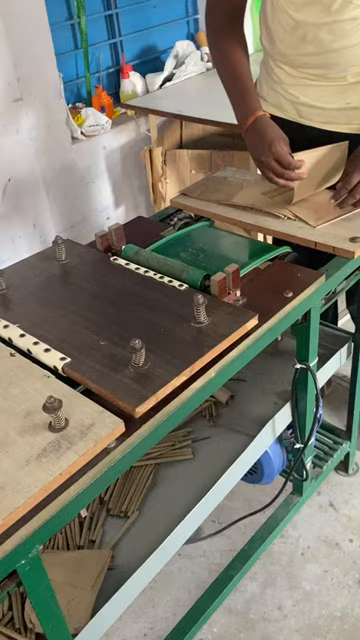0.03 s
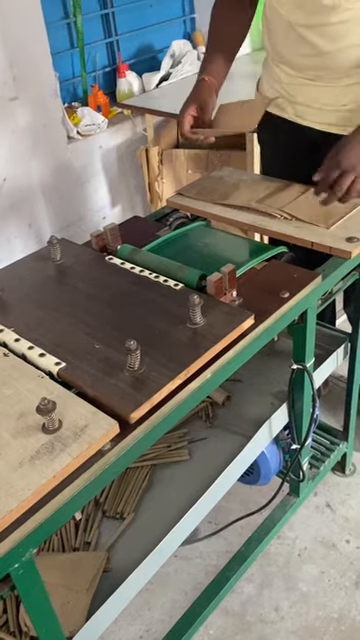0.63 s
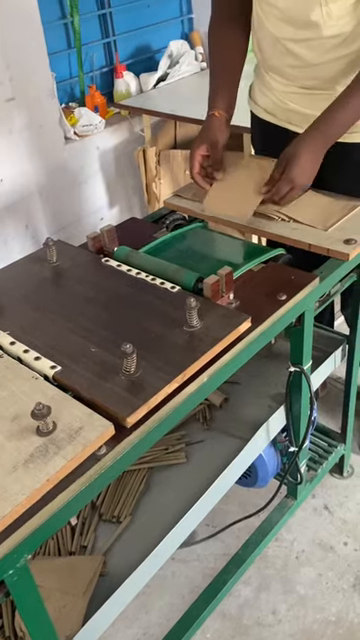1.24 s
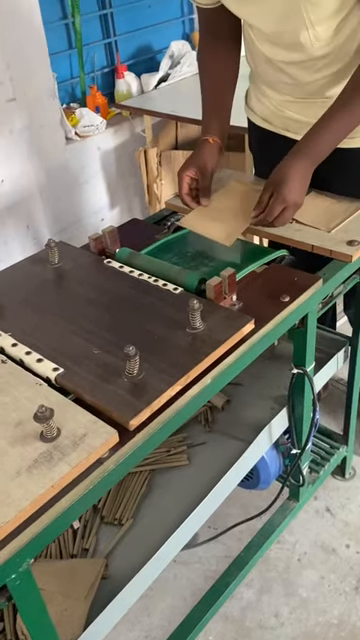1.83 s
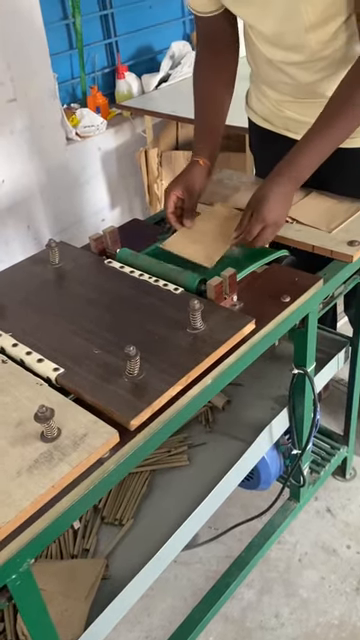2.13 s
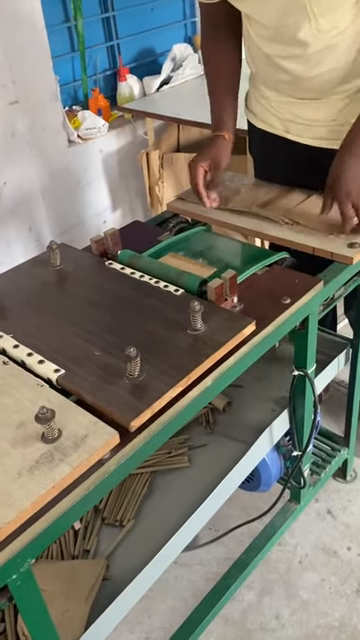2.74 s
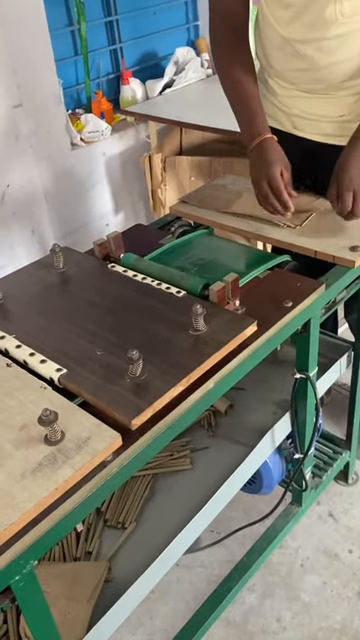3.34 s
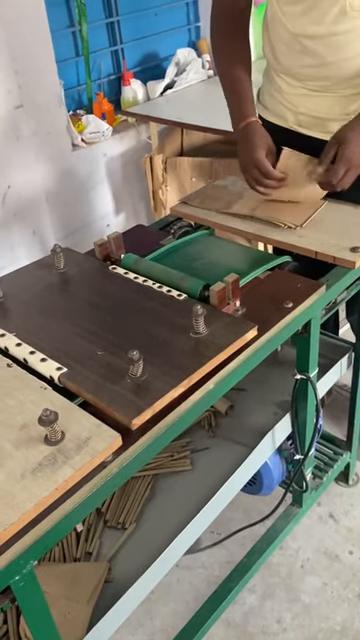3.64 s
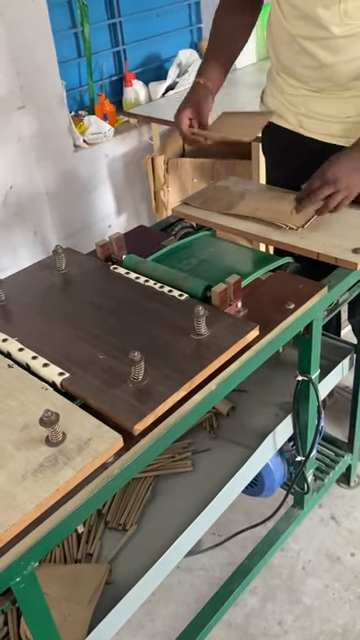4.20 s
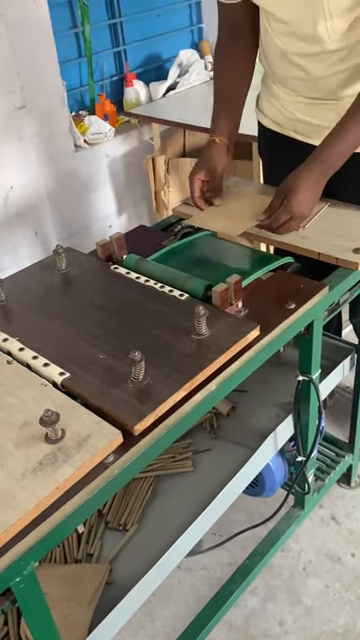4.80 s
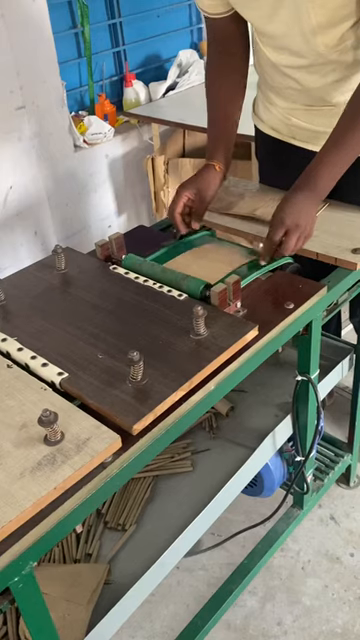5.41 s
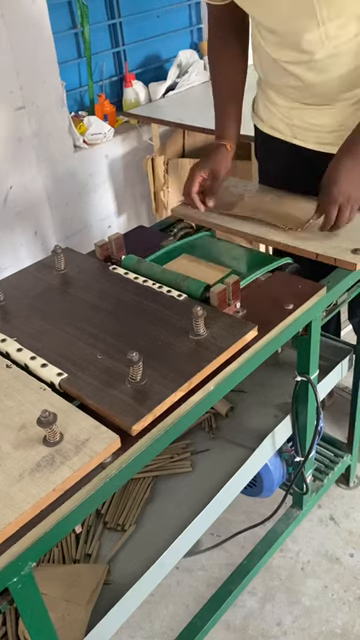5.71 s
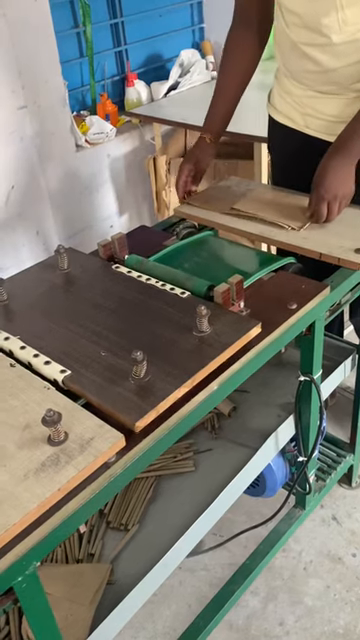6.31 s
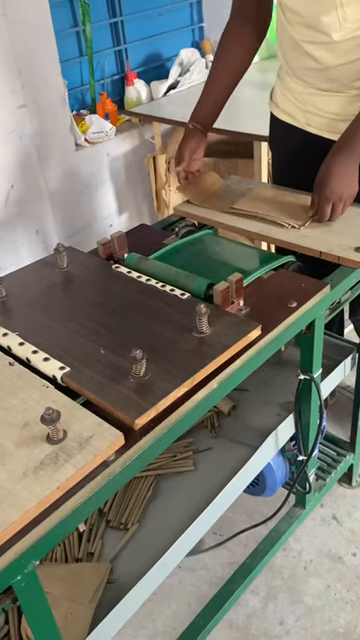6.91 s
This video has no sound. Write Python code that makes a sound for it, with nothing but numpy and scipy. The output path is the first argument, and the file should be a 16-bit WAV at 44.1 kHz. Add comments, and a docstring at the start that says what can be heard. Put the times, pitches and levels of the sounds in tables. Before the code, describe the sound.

A motor-driven rolling machine throbs and rumbles with a jingling metal rattle, while paper sheets rub through and a few wooden knocks sound.

```python
"""A paper-tube rolling machine runs in a small workshop, its induction motor beating against the mains hum.
Friction of belt and rollers drives the frame into a rumble and hiss, and a loose steel part
jingles by repeated impact on every turn of the drive pulley. Hand-fed sheets rub through the boards,
one curling into a hollow tube. A few wooden knocks excite the modes of board and frame,
and wood scrapes briefly. The sound starts abruptly and cuts out once for an instant."""
import sys
import numpy as np
from scipy import signal
from scipy.fft import rfft, irfft
from scipy.io import wavfile
from scipy.ndimage import uniform_filter1d

SR = 44100
rng = np.random.default_rng(int(sys.argv[2]) if len(sys.argv) > 2 else 0)


def dump(signal):
    """Clip the signal to [-1, 1] and save it as 16-bit WAV at the path in sys.argv[1]."""
    limited = np.clip(np.atleast_2d(signal).T, -1, 1)
    pcm = np.round(limited * 32767).astype(np.int16)
    wavfile.write(sys.argv[1], SR, pcm)


N = 306495
TIME = np.arange(N) / SR
FREQ = np.maximum(np.arange(N // 2 + 1) * SR / N, 1)

# motor shaft, slowed a little by load: (time [s], speed [turns/s])
SHAFT_SPEED = [(0, 48.4), (0.3, 47.69), (2.8, 47.69), (3.15, 47.22), (3.5, 47.69), (5.5, 47.68),
               (6.3, 47.36), (6.95, 47.65)]
# motor partials, whose two rates add: (mains multiple [1], shaft multiple [1], relative level [dB])
HUM_LINES = [(0, 1, -16), (0, 2, -6.5), (2, 0, -1.5), (0, 3, -23), (2, 1, -11), (2, 2, -16), (4, 0, -17),
             (0, 5, -15.5), (2, 3, -14), (4, 1, -17), (2, 5, -19), (0, 10, -23.5), (0, 13, -32.5)]
# the rollers grip a sheet and damp the throb: (time [s], hold [s], depth [dB])
LOADS = [(2.74, 0.73, 6), (5.8, 0.69, 6)]
# how hard the machine runs; only swings about the mean count: (time [s], rumble [dB], hiss [dB])
RUNNING = [(0.3, -31, -36.5), (0.91, -32.5, -37.5), (1.17, -29, -35), (1.47, -35, -37), (2.04, -35, -41),
           (2.21, -34.5, -38.5), (2.47, -35, -39), (2.93, -34, -40), (3.24, -31.5, -35.5),
           (4.21, -32.5, -33.5), (4.65, -32, -37), (4.93, -31.5, -38.5), (5.19, -31, -34.5),
           (5.75, -31, -37), (6.13, -32.5, -38), (6.47, -28.5, -37.5), (6.65, -30, -37), (6.95, -31, -36)]
# hard landings of the loose part: (time [s], level [dB])
CHINKS = [(0.1277, -28), (0.1606, -24.5), (0.2427, -24.5), (0.413, -26), (0.497, -18.5), (0.573, -21),
          (0.8754, -29), (0.9712, -22.5), (1.055, -32), (1.125, -25), (1.1446, -22.5), (1.21, -23.5),
          (1.252, -27), (1.28, -23.5), (1.3075, -19), (1.332, -18.5), (1.347, -18.5), (1.4611, -28),
          (1.505, -22), (1.5453, -22), (1.588, -22.5), (1.726, -23), (1.8158, -25), (1.935, -27.5),
          (2.171, -27), (2.226, -26), (2.3517, -25), (2.392, -30), (3.038, -28), (3.056, -29.5),
          (3.097, -26), (3.1325, -23.5), (3.1745, -25), (3.217, -27.5), (3.246, -26), (3.2853, -23),
          (3.345, -24.5), (3.3715, -24), (3.4326, -24), (3.454, -24), (3.471, -21), (3.498, -26),
          (3.5528, -24), (3.583, -24.5), (3.623, -21.5), (3.6651, -20), (3.68, -24), (3.708, -21),
          (3.7618, -34), (3.8357, -20), (4.022, -28), (4.056, -24.5), (4.139, -19), (4.18, -25),
          (4.2218, -24.5), (4.2617, -17.5), (4.387, -23), (4.439, -25), (4.4734, -21), (4.486, -23.5),
          (4.5999, -31), (4.6838, -23), (5.033, -24), (5.221, -23), (5.363, -21.5), (5.403, -17),
          (5.5287, -16.5), (5.556, -23), (5.6147, -23.5), (5.655, -21), (5.8482, -26), (5.989, -20.5),
          (6.032, -28), (6.076, -26), (6.117, -22.5), (6.159, -29), (6.2604, -26), (6.3695, -25),
          (6.423, -26), (6.59, -27.5), (6.864, -28), (6.9082, -27)]
# sliding strokes of paper and of wood: (time [s], level [dB], half length [s])
PAPER_SLIDES = [(0.258, -29.5, 0.052), (1.34, -23, 0.011), (2.234, -34.5, 0.041), (2.47, -31, 0.078),
                (2.67, -33.5, 0.11), (3.157, -49, 0.051), (3.68, -32, 0.053), (5.21, -32, 0.032),
                (5.238, -28.5, 0.015), (5.773, -28, 0.035), (6.603, -32, 0.06), (6.8, -28.5, 0.061)]
WOOD_SCRAPES = [(6.357, -27, 0.013), (6.378, -30.5, .014), (6.398, -23, 0.016), (6.445, -30, 0.0096)]
# blows: (time [s], board thud [dB], frame clack [dB], crack [dB], thud and clack t60 [s], pan L-R [dB],
# clack pitch [Hz], lift of the first swing [dB], board ring [dB], frame ring [dB])
KNOCKS = [(1.3492, -40, -14.5, -20, 0.07, -6, 1820, 2, -50, -40),
          (1.3521, -46, -21.5, -33, 0.049, 3, 1776, 20, -32, -45),
          (1.3584, -20, -14.5, -18, 0.053, 4, 1270, 10, -33.5, -34),
          (2.4275, -29, -26, -17.5, 0.09, -4.5, 1840, 3, -45, -38),
          (2.4315, -19, -22, -15, 0.082, 1, 1470, 2, -37, -20),
          (2.4365, -19.5, -28, -32, 0.12, 1, 1130, 0, -22.5, -36),
          (2.609, -23.5, -28, -29.5, 0.21, 1, 1530, 0, -35, -37),
          (5.2238, -36, -20.5, -16, 0.031, 2, 1550, 8, -36, -32),
          (5.2378, -30.5, -16, -29, 0.057, -2, 1980, 3, -42, -34),
          (5.782, -34, -19, -12, 0.016, 8, 1550, 4, -32, -36),
          (6.2995, -14.5, -22.5, -22.5, 0.24, -0.5, 1430, 5, -13.5, -25),
          (6.382, -40, -27, -29, 0.22, 5, 1550, -4, -27.5, -40)]

# spectra of friction and impact noise: (frequency [Hz], relative density [dB])
RUMBLE_SPECTRUM = [(35, -33), (55, -14), (78, -1), (100, -25), (125, -11.5), (148, -1.5), (175, -3.5),
                   (215, -10), (248, 2.5), (300, -5.5), (380, -6), (470, 1), (700, -4), (1200, -18.5)]
RUB_SPECTRUM = [(500, 2.5), (850, 3), (1200, -1.5), (1480, -4.5), (2100, 1), (2700, -3), (4000, -15.5)]
HISS_SPECTRUM = [(1800, -9), (2800, 0), (4000, 0.5), (5600, 2), (6500, 1), (9000, -11), (12000, -18),
                 (13500, -23), (16000, -39)]
RATTLE_SPECTRUM = [(2000, 7), (3000, -10), (5500, -4), (7000, 4), (9500, -5.5), (11500, -10.5), (12500, -3),
                   (13500, -21), (16000, -36)]
CHINK_SPECTRUM = [(2000, 8), (3000, -4), (5500, 0.5), (7000, 14), (9500, -0.5), (11500, -6), (13000, -2.5),
                  (16000, -12)]
TUBE_SPECTRUM = [(300, -17), (600, -8.5), (850, -8.5), (1100, -12), (1400, -16.5), (3000, -22.5)]
THUD_SPECTRUM = [(80, -34), (200, -0.5), (330, -5), (450, -7), (540, 1.5), (680, -5), (900, -4),
                 (1300, -36), (3000, -8)]
CLACK_SPECTRUM = [(400, -14), (850, 1), (1150, -8.5), (1480, -2), (1900, -6.5), (2500, -7), (4000, -40),
                  (9000, -22.5)]
CRACK_SPECTRUM = [(1500, -10), (3000, 0.5), (4800, 0.5), (6000, 3), (8000, -4.5), (11000, -19),
                  (16000, -28)]
SCRAPE_SPECTRUM = [(450, 4), (1000, -10), (1500, -1), (2000, -10), (2800, -13)]
# resonances that colour the noise: (frequency [Hz], bandwidth [Hz], lift [dB])
FRAME_MODES = [(242.5, 9.9, 6.3), (320, 136, 2.7), (461.5, 11, 3.2), (603, 10.6, 5.7), (1462, 160, 8.4),
               (1645, 23, 7.6), (1830, 15, 2.7), (1950, 7.5, 1), (3502, 47, 8.7), (4900, 180, 0.9)]
STEEL_MODES = [(3140, 70, 16), (4650, 1000, 9.5), (5580, 84, -0.5), (9970, 110, 14), (10730, 230, 9)]
TUBE_MODES = [(620, 70, 1.5), (790, 62, 4.5), (1000, 100, 1.5)]
BOARD_MODES = [(440, 120, 14.3), (637, 58, 12), (730, 69, 17), (840, 38, 5.7)]
SCRAPE_MODES = [(1550, 52, 9)]
# free vibration after a blow: (frequency [Hz], relative level [dB], t60 [s])
STEEL_RING = [(3306, -21, 0.045), (4910, -5, 0.042), (5495, -4.5, .035), (9860, -3, 0.022)]
BOARD_RING = [(262, -5, 0.083), (464.7, -5.5, 0.29), (606.4, 1, 0.12), (698, -6, 0.29), (830, -9.5, 0.32)]
FRAME_RING = [(1130, 1, 0.072), (1465, -1.5, 0.16), (1910, 5, 0.094), (1995, -3, 0.085), (3400, -13, 0.22),
              (4250, -13, .11), (4825, -1, .08)]

# likeness of the sound at two microphone ports: (frequency [Hz], coherence [0-1])
PORT_COHERENCE = [(100, .999), (180, .99), (350, .88), (700, .68), (1400, .64), (2800, .56), (5000, .79),
                  (10000, .9)]
# phase between the ports: (frequency [Hz], lead of the left [rad])
PORT_LEAD = [(150, 0), (600, .7), (1890, .4), (2760, 2.1), (4050, .4), (5340, .3), (6460, 2.8), (8180, 3.8),
             (9730, 6.2), (11600, 6.4), (12500, 9.4)]
# balance between the ports: (frequency [Hz], level L-R [dB])
PORT_BALANCE = [(200, 0), (380, 1), (700, 4.5), (1290, 3), (2380, -1.8), (4400, 0)]
# hollows in the treble: (frequency [Hz], bandwidth [Hz], gain [dB])
TREBLE_DIPS = [(7280, 1700, -24), (13900, 1200, -9)]

SIDES = np.array([[1], [-1]])   # left, right
BLOW_ATTACK_S = 0.00091


def from_db(db):
    """Amplitude ratio of a level in decibels."""
    return 10 ** (np.asarray(db) / 20)


def rms_one(x):
    """Normalisation to unit power."""
    return x / np.sqrt(np.mean(x ** 2) + 1e-20)


def in_time(rows):
    """Linear interpolation of each column over time."""
    times, *columns = np.transpose(rows)
    return [np.interp(TIME, times, column) for column in columns]


def over_hz(points):
    """Linear interpolation over log frequency."""
    hz, value = np.transpose(points)
    return np.interp(np.log(FREQ), np.log(np.maximum(hz, 1)), value)


def drift(corner_hz):
    """Random fluctuation: low-passed noise of unit power."""
    return rms_one(irfft(rfft(rng.standard_normal(N)) / (1 + (FREQ / corner_hz) ** 2), N))


def ports():
    """Transfer function of each port: gain and phase against frequency."""
    return from_db(SIDES * over_hz(PORT_BALANCE) / 2) * np.exp(.5j * SIDES * over_hz(PORT_LEAD))


def noise(spectrum, modes=()):
    """Source and filter: partly coherent stereo noise, shaped by a spectrum and resonances."""
    octaves_outside = np.abs(np.log2(FREQ / np.clip(FREQ, spectrum[0][0], spectrum[-1][0])))
    level_db = over_hz(spectrum) - 20 * octaves_outside
    level_db += sum(lift / (1 + (2 * (FREQ - hz) / width) ** 2) for hz, width, lift in modes)
    coherence = np.clip(over_hz(PORT_COHERENCE), 0, 1)
    mid, side = rfft(rng.standard_normal((2, N)))
    pair = np.sqrt(1 + coherence) * mid + np.sqrt(1 - coherence) * side * SIDES
    return rms_one(irfft(pair * ports() * from_db(level_db), N))


def chatter(sound, depth_db):
    """Random amplitude modulation of narrow bands makes the noise flicker."""
    _, _, frames = signal.stft(sound, nperseg=1024)
    swell = rms_one(uniform_filter1d(rng.standard_normal(frames.shape[1:]), size=3, axis=1))
    swell = rms_one(uniform_filter1d(swell, size=2, axis=0))
    return rms_one(signal.istft(frames * from_db(depth_db * swell))[1][:, :N])


def running():
    """Slow modulation of rumble and belt hiss about their means, in dB."""
    return [db - db.mean() for db in in_time(RUNNING)]


def load(grip_s=0.1, release_s=0.39):
    """Damping of the throb by the sheets, in dB: a quick grip, a hold, a slow release."""
    return sum(depth * np.clip(np.minimum((TIME - s) / grip_s, 1 - (TIME - s - hold) / release_s), 0, 1)
               for s, hold, depth in LOADS)


def motor(turns, level_db, mains_hz=50):
    """Beating: twice the shaft rate lies just under the magnetic hum, giving about five throbs a second."""
    throb_db = level_db + running()[0] - load()
    hum = 0
    for of_mains, of_shaft, line_db in HUM_LINES:
        cycles = of_mains * mains_hz * TIME + of_shaft * turns
        order = of_mains + of_shaft
        shudder = from_db(-13.5) * (order - 1) * drift(18.3)   # phase jitter smears high lines most
        swell_db = throb_db if order == 2 else (throb_db + throb_db.mean()) / 2
        waver_db = (3.5 if order > 2 else 1.2) * drift(5.9)
        hum += from_db(line_db + swell_db + waver_db) * np.cos(2 * np.pi * cycles + shudder)
    return np.sqrt(2) * hum


def rollers(turns, rumble_db, rub_db, hiss_db):
    """Forced vibration: belt and rollers shake the frame as their grip catches unevenly."""
    rumble_swing, hiss_swing = running()
    rub_swing = (rumble_swing + hiss_swing) / 2
    grip_db = 0.1 * np.cos(2 * np.pi * turns) + drift(61) + 1.6 * drift(1.4)
    rumble = chatter(noise(RUMBLE_SPECTRUM, FRAME_MODES), depth_db=1.5)
    rub = chatter(noise(RUB_SPECTRUM, FRAME_MODES), depth_db=3.5)
    hiss = chatter(noise(HISS_SPECTRUM, FRAME_MODES), depth_db=3.2)
    return (rumble * from_db(rumble_db + rumble_swing + grip_db / 2)
            + rub * from_db(rub_db + rub_swing + grip_db)
            + hiss * from_db(hiss_db + hiss_swing + grip_db))


def touches(times, level_db, bounce_s, bounce_db, t60, attack_s):
    """Envelope of double contacts: their energies add and decay exponentially."""
    bounces = times + bounce_s * rng.uniform(0.98, 1.7, len(times))
    starts = np.clip((np.r_[times, bounces] * SR).astype(int), 0, N - 1)
    impulses = np.zeros(N)
    np.add.at(impulses, starts, from_db(np.r_[level_db, level_db + bounce_db]) ** 2)
    energy = signal.lfilter([1], [1, -from_db(-120 / (t60 * SR))], impulses + 1e-18)
    lag = np.exp(-1 / (attack_s * SR))
    return signal.lfilter([1 - lag], [1, -lag], np.sqrt(energy))


def ringing(times, level_db, modes, scatter_db, detune):
    """Modal superposition: damped sines whose strength and pitch vary from blow to blow."""
    hz, mode_db, t60 = np.transpose(modes)
    age, out = TIME[:int(t60.max() * SR)], np.zeros(2 * N)
    fade = from_db(-60 * age / t60[:, None]) * (1 - np.exp(-age / BLOW_ATTACK_S))
    chance = rng.standard_normal((len(times), 2, len(hz)))
    for s, blow_db, (strength, pitch) in zip(times, level_db, chance):
        start = max(int(s * SR), 0)
        waves = np.sin(2 * np.pi * np.outer(hz * (1 + detune * pitch), age)) * fade
        out[start:start + len(age)] += from_db(blow_db + mode_db + scatter_db * strength) @ waves
    return irfft(rfft(out[:N]) * ports(), N)


def loose_part(turns, level_db, limit_db, rebound_db, scatter_db):
    """Periodic impact: the pulley, at half shaft speed, throws the part once a turn; it rebounds twice."""
    count = np.arange(int(turns[-1] * 3 / 2))
    timing, strength = rng.standard_normal((len(count), 2)).T
    times = np.interp(count * 2 / 3, turns, TIME) + 0.0011 * timing
    belt_db = np.interp(times, TIME, running()[1])
    throw_db = np.minimum(level_db + 2.1 * belt_db, limit_db)   # grows until the play is used up
    hit_db = throw_db + rebound_db * (count % 3 > 0) + scatter_db * np.clip(strength, -2, 1.5)
    envelope = touches(times, hit_db, bounce_s=0.004, bounce_db=-2, t60=0.031, attack_s=0.00054)
    grain = from_db(0.5 * drift(600))
    contact = envelope * grain * chatter(noise(RATTLE_SPECTRUM, STEEL_MODES), depth_db=1.5)
    return contact + ringing(times, hit_db - 2, STEEL_RING, scatter_db=2.5, detune=0.0092)


def chinks(settle_s, settle_db):
    """Hard impact excites high modes: the part lands with a bright chink, then settles more lightly."""
    times, hit_db = np.transpose(CHINKS)
    times = np.r_[times, times + settle_s * rng.uniform(.5, 1.5, len(times))]
    hit_db = np.r_[hit_db, hit_db + settle_db]
    envelope = touches(times, hit_db + 0.2, bounce_s=0.0039, bounce_db=-6.5, t60=0.034, attack_s=0.00058)
    grain = from_db(2 * drift(490))
    contact = envelope * grain * chatter(noise(CHINK_SPECTRUM, STEEL_MODES), depth_db=3.5)
    return contact + ringing(times, hit_db - 4.5, STEEL_RING, scatter_db=6, detune=0.015)


def strokes(rows):
    """Gaussian envelopes: each sliding stroke swells and fades smoothly."""
    return sum(from_db(db) * np.exp(-((TIME - s) / half_length) ** 2) for s, db, half_length in rows)


def paper_slides(grain_db):
    """Sliding friction: sheets rasp over the table and belt."""
    return strokes(PAPER_SLIDES) * from_db(grain_db * drift(150)) * noise(RUB_SPECTRUM, FRAME_MODES)


def knocks(board_hz, swing_t60, room_db, room_t60):
    """Impulse response: a blow swings the main modes, scatters into the rest and reverberates."""
    thud = noise(THUD_SPECTRUM, BOARD_MODES)
    clack = noise(CLACK_SPECTRUM, FRAME_MODES)
    crack = noise(CRACK_SPECTRUM)
    out = np.zeros((2, N))
    for s, thud_db, clack_db, crack_db, t60, pan_db, frame_hz, swing_db, _, _ in KNOCKS:
        start = int(s * SR)
        age = TIME[:min(SR // 2, N - start)]
        span = slice(start, start + len(age))
        board = from_db(thud_db) * np.sin(2 * np.pi * board_hz * age)
        frame = from_db(clack_db) * np.sin(2 * np.pi * frame_hz * age)
        blow = (board + frame) * from_db(swing_db - 60 * age / swing_t60)
        room_tail = from_db(room_db - 60 * age / room_t60)
        parts = (thud, thud_db, t60), (clack, clack_db, t60), (crack, crack_db, 0.61 * t60)
        for sound, db, part_t60 in parts:
            fade = np.hypot(from_db(-60 * age / part_t60), room_tail)
            blow = blow + sound[:, span] * fade * from_db(db)
        attack = 1 - np.exp(-(age / BLOW_ATTACK_S) ** 2)
        out[:, span] += blow * attack * from_db(SIDES * pan_db / 2)
    return out


def after_ring(scatter_db, detune):
    """Free vibration: board and frame ring on after the knocks."""
    times, *_, board_db, frame_db = np.transpose(KNOCKS)
    board = ringing(times, board_db, BOARD_RING, scatter_db, detune)
    return board + ringing(times, frame_db, FRAME_RING, scatter_db, detune)


def curling_tube(peak_s, peak_db, rise_db_per_s, fall_db_per_s, grain_db):
    """Hollow resonance: a sheet scrubs along the boards as it curls into a tube."""
    age = TIME - peak_s
    curl_db = peak_db + np.minimum(rise_db_per_s * age, -fall_db_per_s * age)
    return from_db(curl_db + grain_db * drift(80)) * noise(TUBE_SPECTRUM, TUBE_MODES)


def wood_scrape(grain_db):
    """Stick-slip friction: wood drags in a few grainy jerks with a nasal resonance."""
    return strokes(WOOD_SCRAPES) * from_db(grain_db * drift(200)) * noise(SCRAPE_SPECTRUM, SCRAPE_MODES)


def scene():
    """Superposition: one shaft drives hum, rollers and rattle; paper and wood add to them."""
    turns = np.cumsum(in_time(SHAFT_SPEED)[0]) / SR
    hum = motor(turns, level_db=-28)
    rolling = rollers(turns, rumble_db=-30.5, rub_db=-34.5, hiss_db=-38)
    steel = loose_part(turns, level_db=-40, limit_db=-35.5, rebound_db=-2, scatter_db=6.5)
    steel += chinks(settle_s=0.011, settle_db=-10.5)
    paper = curling_tube(peak_s=4.1, peak_db=-23, rise_db_per_s=51, fall_db_per_s=36, grain_db=1.5)
    paper += paper_slides(grain_db=2.5)
    wood = knocks(board_hz=660, swing_t60=0.017, room_db=-23.5, room_t60=0.61)
    wood += after_ring(scatter_db=1.8, detune=0.0032)
    wood += wood_scrape(grain_db=2)
    return hum + rolling + steel + paper + wood


def record(dry, start_s=0.0715, gap_s=(2.131, 2.157), cutoff_hz=16100):
    """Filtering and gating: two treble notches, an abrupt start, one brief gap and a steep low-pass."""
    for hz, width_hz, gain_db in TREBLE_DIPS:
        b, a = signal.iirpeak(hz, hz / width_hz, fs=SR)
        for _ in range(2):
            dry = dry - (1 - from_db(gain_db / 2)) * signal.lfilter(b, a, dry)
    audible = (TIME > start_s) & ((TIME < gap_s[0]) | (TIME > gap_s[1]))
    gate = uniform_filter1d(np.where(audible, 1, from_db(-72)), size=40)
    low_pass = signal.ellip(10, .2, 70, cutoff_hz, fs=SR, output="sos")
    return signal.sosfilt(low_pass, dry * gate)


dry = scene()
out = record(dry)
dump(out)
```